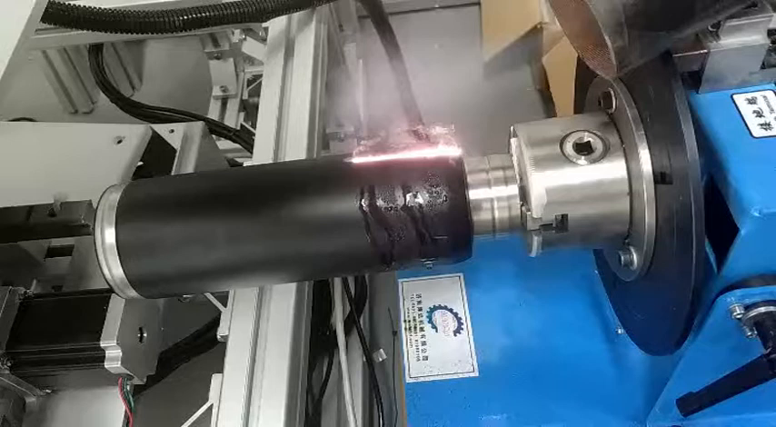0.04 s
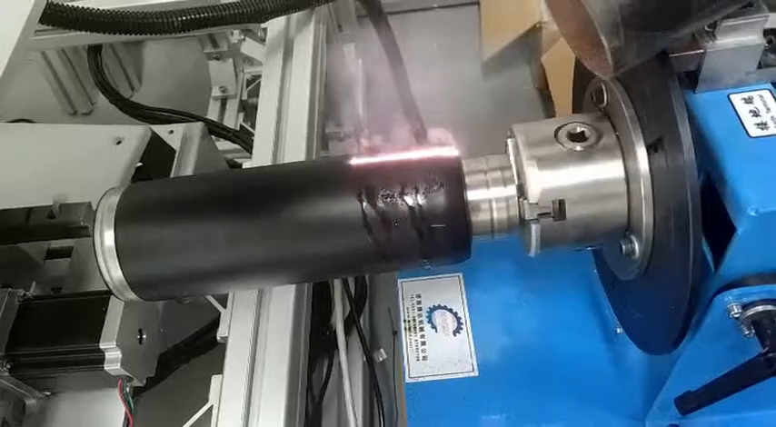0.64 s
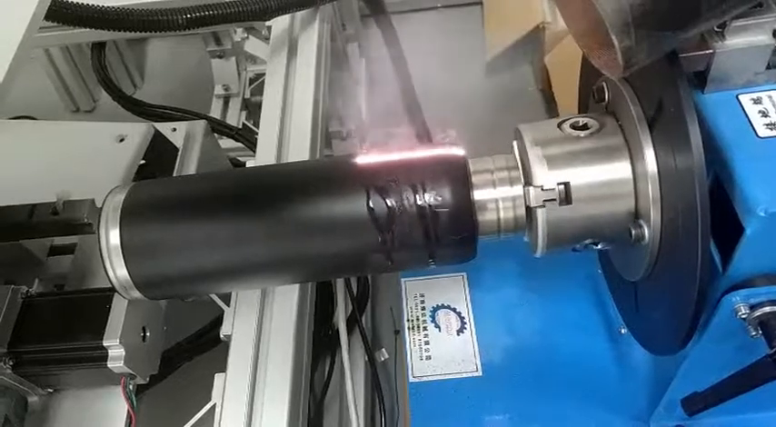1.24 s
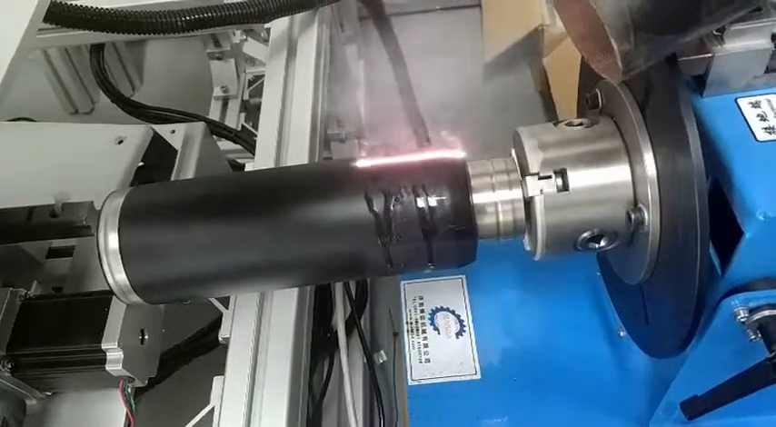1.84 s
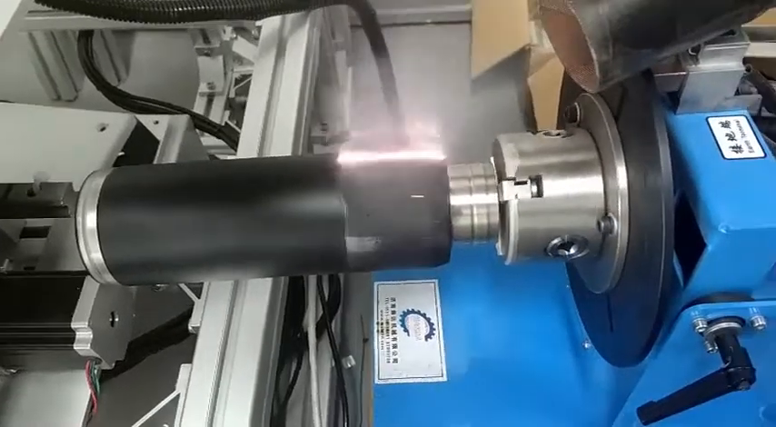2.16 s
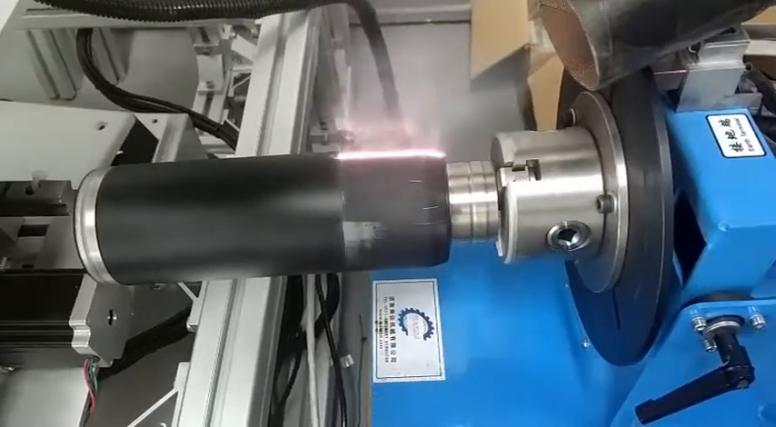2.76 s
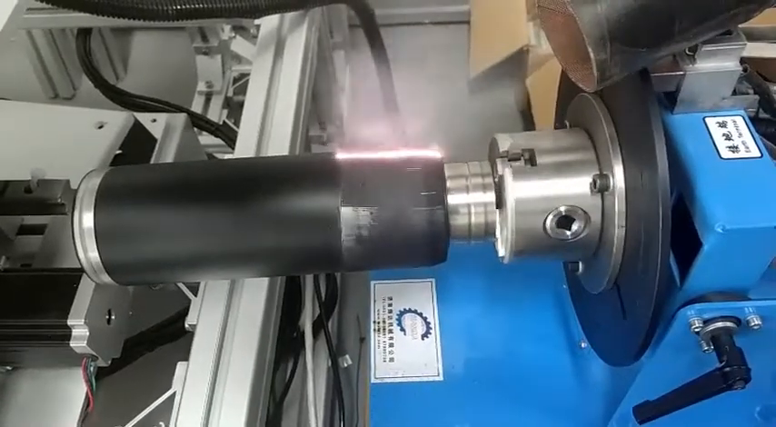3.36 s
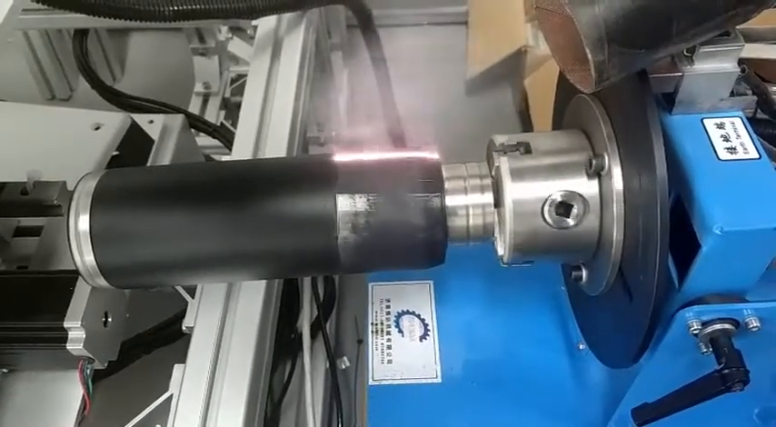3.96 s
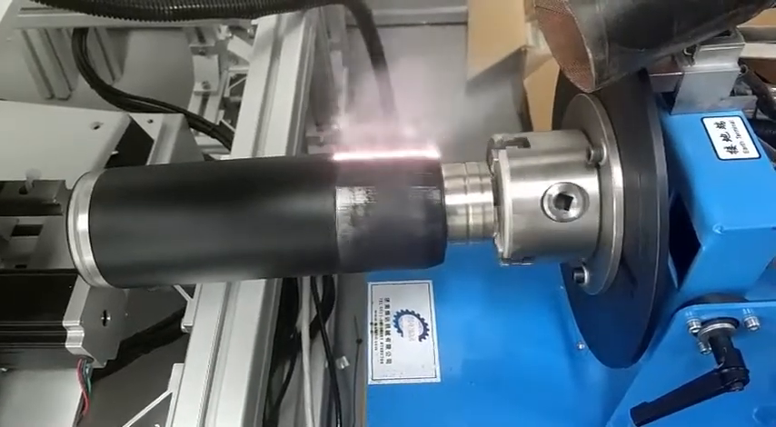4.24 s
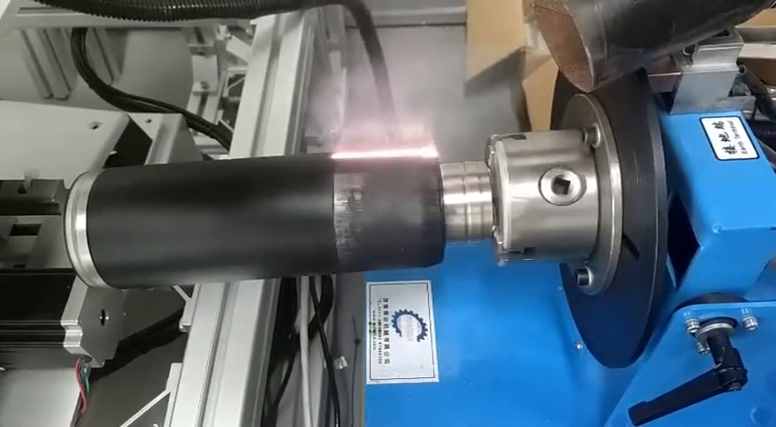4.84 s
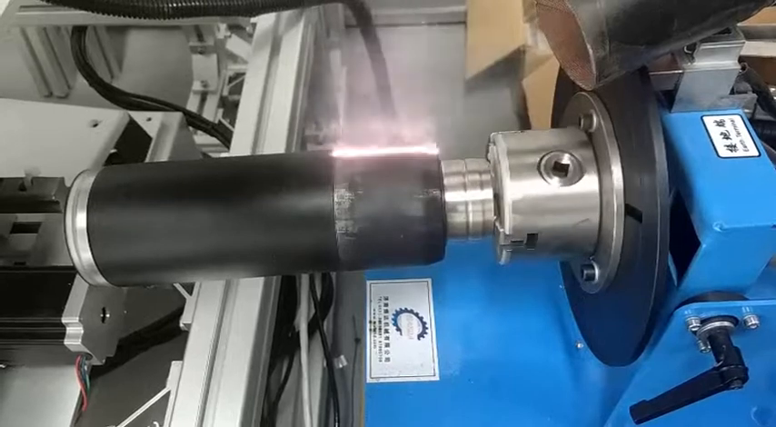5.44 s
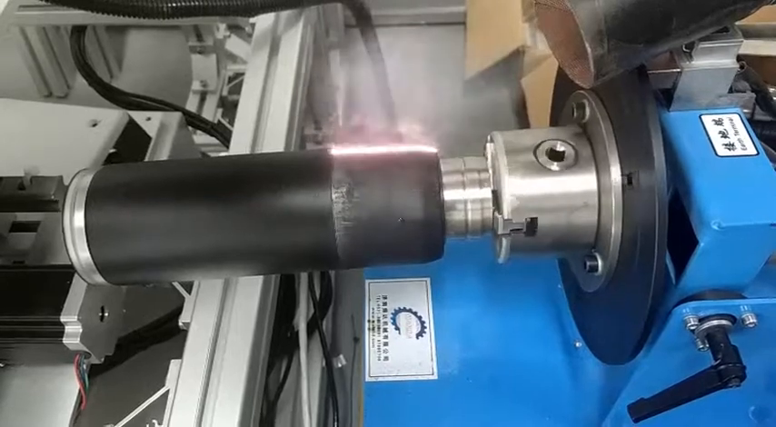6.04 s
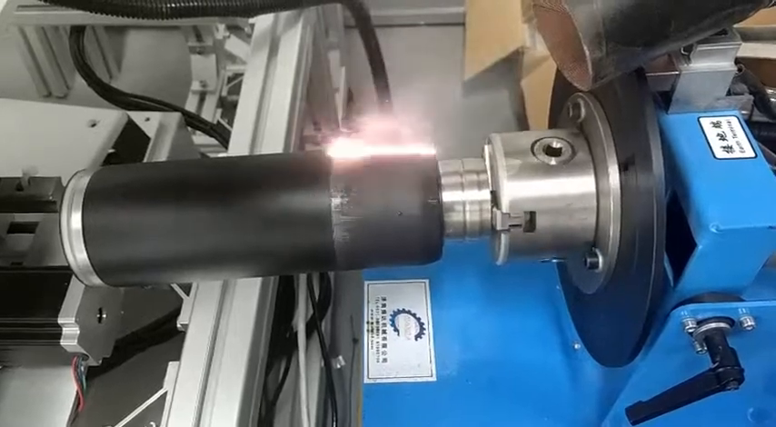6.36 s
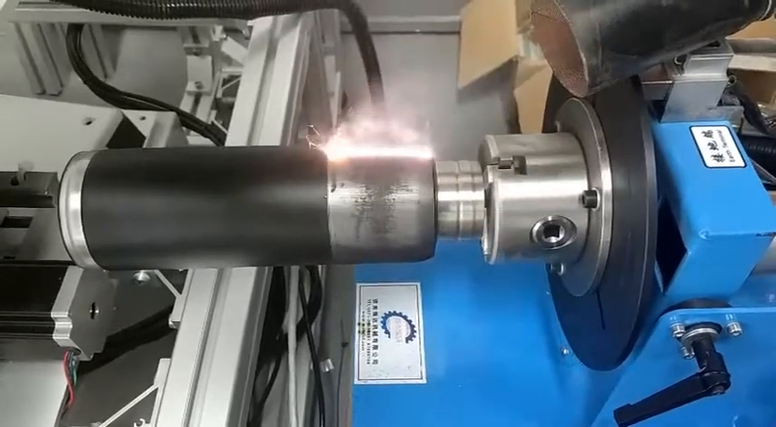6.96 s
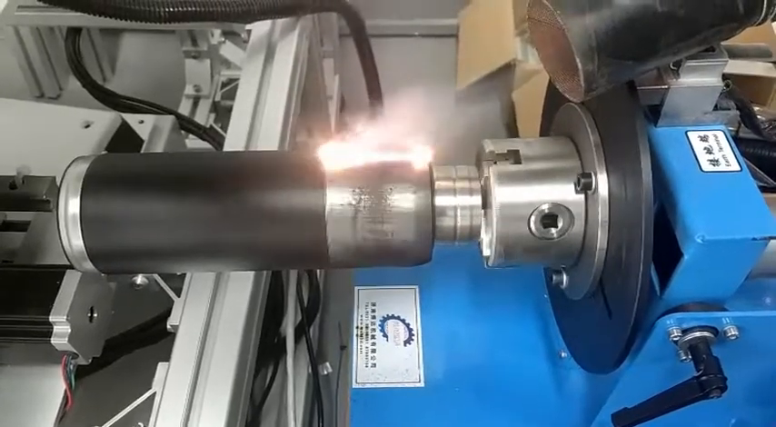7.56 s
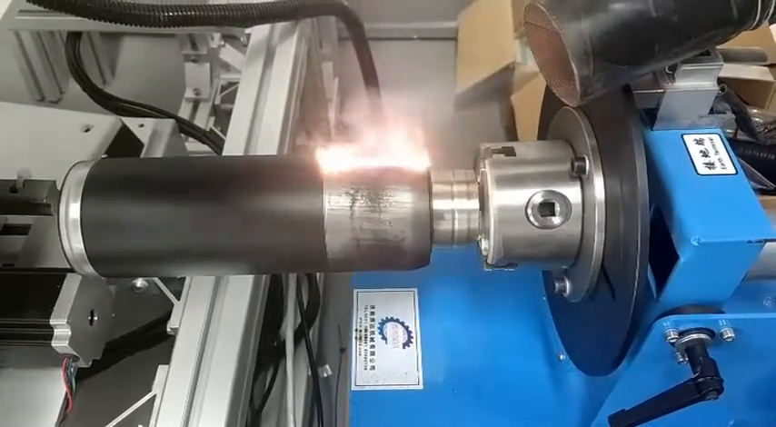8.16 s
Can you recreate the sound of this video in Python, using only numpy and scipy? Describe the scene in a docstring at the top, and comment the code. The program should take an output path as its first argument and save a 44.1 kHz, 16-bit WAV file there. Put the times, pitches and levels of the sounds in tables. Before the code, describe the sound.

A scanning laser burns black coating off a turning metal roller, close by in a workshop. It makes a loud, high sizzle with a fast, even buzz and fine snapping over a fluttering low roar. After about two seconds the roar thins and the hiss carries on. Later, short runs of chirping spurts appear, and the last pass sounds harsher and more crackly. Fume extraction rumbles very faintly underneath.

```python
"""A scanning laser strips black coating from a turning metal roller in three passes, close by in a workshop.
Ablation boils the coating off in countless vapour bursts: a low roar, a middle sputter and a high sizzle.
The beam sweeps to and fro fifty times a second, modulating the sizzle into a buzz and snapping as it turns.
Each pass meets a surface with its own spectrum; the machine frame resonates and the room reverberates.
Fume extraction rumbles faintly, a few soft thumps sound, and later on flakes burst off in short spurts."""
import sys
import numpy as np
from scipy import signal
from scipy.fft import rfft, irfft, next_fast_len
from scipy.io import wavfile
from scipy.ndimage import uniform_filter1d

SR = 44100
rng = np.random.default_rng(int(sys.argv[2]) if len(sys.argv) > 2 else 0)


def transcribe(u):
    """Save the signal u as a 16-bit wav file named by the first command-line argument.

    u: samples, shape (n,) or (channels, n), limited to [-1, 1]; the rate is SR.
    q: integer samples, one column per channel.
    """
    v = np.clip(np.atleast_2d(u).T, -1, 1)
    q = np.round(v * 32767).astype(np.int16)
    wavfile.write(sys.argv[1], SR, q)


N = 361179

SCAN_HZ, SPURT_HZ, TOP_HZ = 49.91, 2200, 11000
# the passes: thick top coat, grey undercoat, nearly bare metal (which fries most evenly)
PASS_START_S, GRAIN_DB = [0.1155, 2.186, 6.491], [1.0, .7, .4]
LAYER_EDGES_HZ = [1100, 3500]  # between roar, sputter and sizzle
THROB_TOP_HZ, RING_EDGES_HZ, HISS_EDGES_HZ = 290, [700, 1100], [3700, 5650]
# random flicker of roar, sputter and sizzle, together and each alone
FLICKER_SHARED_DB, FLICKER_OWN_DB, FLICKER_PER_S = (0.67, 0.38, 0.46), (.5, 0.54, 0.29), 22
# how far the sizzle follows a flare of the sputter, and each layer a lull
FLARE_SIZZLE_SHARE, LULL_SHARES = 0.073, (0.93, 0.98, 0.29)

# part of the burn that repeats from sweep to sweep: f/Hz, share of power
PERIODIC_SHARE = [(200, .06), (2000, .02), (2500, .03), (3600, .06), (4600, .25), (5300, .3), (7200, .36),
                  (8200, .12), (10000, .15)]
# swell of the burn along a sweep: phase/sweeps, gain/dB in pass 1, in pass 2, in pass 3
SWEEP_SWELL = [(.05, 0, 0, -.5), (.12, -1.2, -.3, -3.5), (.21, -1, 1.8, 0), (.26, -2, -1.2, 1),
               (.37, .3, 0, 0), (.48, .7, .2, -3.5), (.6, -.4, -.5, -5.5), (.68, .6, -.6, -3),
               (.78, -1.3, -2.3, 1.2), (.9, -1, -1, -.3)]
# borders of the bands that flutter independently: f/Hz
FLUTTER_EDGES = [350, 650, 1100, 1950, 3000, 5000, 7000, 8100, 8700, 9400]
# slow wavering of those bands, low to high: spread/dB
BAND_WAVER = [.9, .8, .7, .3, .2, .2, .3, .6, .8, .8, .8]
# snaps at the beam's turning points: pass index, phase/sweeps, gain/dB, decay time/ms
TURNING_SNAPS = [(0, .143, 2.5, .45), (0, .634, 10.5, .15), (1, .159, 7.5, .35), (1, .658, -1, .2),
                 (2, .001, 4.5, .8), (2, .5, 3.5, .15)]
# growth of the snaps as the metal comes bare: t/s, gain/dB
SNAP_GROWTH = [(7.1, 0), (7.6, 1.8), (7.85, 3.5)]
# single harder snaps: t/s, gain/dB
HARD_SNAPS = [(.193, 1.5), (.534, 2), (.634, 4), (.694, 2.5), (.774, 5), (.814, 0), (4.912, 4),
              (6.455, 3.5), (6.475, 7), (8.175, 4)]
# spectral envelope of each burning surface: f/Hz, gain/dB
TOP_COAT_SPECTRUM = [(100.0, -28), (150.0, -10), (195.0, 1.7), (480.0, 1), (900.0, -1.5), (1300.0, -8),
                     (2200.0, -12.5), (3100.0, -10), (4300.0, -8), (6700.0, -2.5), (7500.0, -0.5),
                     (9400.0, 0), (10200.0, -10.5), (11000.0, -36)]
UNDERCOAT_SPECTRUM = [(100.0, -56), (150.0, -19), (195.0, -6.5), (480.0, -9), (900.0, -8.5), (1300.0, -6.5),
                      (2200.0, -12), (3100.0, -12.5), (4300.0, -12.5), (6700.0, -10.5), (7500.0, -1.1),
                      (9400.0, -0.5), (10200.0, -9), (11000.0, -25.5)]
BARE_METAL_SPECTRUM = [(100.0, -62), (150.0, -18.5), (195.0, -3), (480.0, -5.5), (900.0, -5.5),
                       (1300.0, -1.5), (2200.0, -6.5), (3100.0, -5), (4300.0, -11), (6700.0, -10.5),
                       (7500.0, -2.5), (9400.0, 0), (10200.0, -12), (11000.0, -25)]
# narrow bands of each burning surface: f/Hz, width/Hz, gain/dB
TOP_COAT_BANDS = [(190, 51, -1), (318, 57, 2.5), (556, 93, -3), (890, 130, 2.6), (4620, 110, 4.5),
                  (5880, 120, 5.5), (6060, 70, -4), (6190, 310, 4), (7200, 89, 3.5), (7780, 290, 8),
                  (8580, 140, 3.5), (8800, 200, 6.5), (9150, 330, 6.5), (9750, 300, -0.5), (10760, 490, 16)]
UNDERCOAT_BANDS = [(4760, 420, 4), (5300, 240, 3.8), (5690, 400, 6), (5900, 140, 3), (6320, 100, 4.5),
                   (6560, 100, 5.5), (7270, 89, 5.5), (7500, 100, 1), (7780, 160, 0.5), (8060, 120, 4),
                   (8360, 340, 7), (9350, 200, 4), (9880, 230, 5)]
BARE_METAL_BANDS = [(400, 100, -1), (850, 120, 0), (2220, 220, 2.6), (4740, 300, 4.6), (5300, 220, 2.5),
                    (5800, 320, 5), (7700, 260, 0.5), (8350, 320, 5.2), (9970, 220, 7)]
# resonances and hollows of roller, frame and surrounding space: f/Hz, width/Hz, gain/dB
FRAME_MODES = [(209.4, 28, 8.5), (252.8, 29, 9.5), (296.4, 20, 6), (346, 9.9, 5), (429, 60, 6.5),
               (455, 26, 0.5), (508.3, 22.6, 9), (556.6, 27, 7.5), (629.5, 14, 7), (670, 30, -0.5),
               (797.6, 39, 9.5), (871, 61, 10), (1014, 39, 8.5), (1342, 51, 3.5), (1400, 46, -5.5),
               (1590, 25, 7.5), (1737, 103, 7), (1883, 34, -5), (1916, 34, 7), (2210, 460, 11.3),
               (2400, 110, -3), (2600, 280, 2.5)]
# slow course of each pass: t/s, base level/dB of roar, of sputter, of sizzle
TOP_COAT_BURN = [(0.14, -31, -31, -20), (.85, -28.5, -30.8, -21), (1.3, -29, -31.5, -19.5),
                 (2.17, -29.5, -30.5, -20.5)]
UNDERCOAT_BURN = [(2.2, -31.5, -28.5, -20.7), (2.6, -34, -28.5, -20.5), (3.45, -32.5, -29, -20.5),
                  (4.25, -34, -28, -21), (4.65, -32.5, -29.5, -20.5), (5.3, -33, -27.5, -20.5),
                  (5.75, -32, -28, -21.5), (6.47, -34, -29.5, -21)]
BARE_METAL_BURN = [(6.52, -30.5, -27.5, -22), (7.6, -32, -27.5, -21.5), (8.1, -33.5, -28, -20.5)]
# flares on thick patches of coating: centre t/s, length/s, roar gain/dB, sputter gain/dB
FLARES = [(0.26, 0.17, 5, 2), (.49, 0.3, 4.3, 1.5), (0.65, 0.17, 2.5, 0.5), (1.07, 0.17, 1.5, 3.5),
          (1.377, 0.082, 2.5, 0.5), (1.786, 0.1, 3.5, 2), (1.9, 0.082, 3.5, 0), (2.06, 0.15, 4, 0),
          (2.154, 0.067, 4, 0.5), (2.97, 0.09, 3.5, 2.5), (4.0, 0.11, 1, 0.5), (4.287, 0.12, -1, 0),
          (4.686, .07, 3.5, 3.5), (4.84, 0.097, 3, -1), (5.263, 0.073, 3.5, -0.5),
          (5.793, 0.097, 2.5, -0.5), (6.66, 0.087, 3.5, 1.5), (7.462, 0.11, 4, 0), (7.7, 0.076, 3, 1.5)]
# lulls on thin patches: centre t/s, length/s, gain/dB before LULL_SHARES
LULLS = [(2.533, .16, -1.5), (3.697, 0.23, -3), (4.178, 0.23, -3), (4.375, 0.12, -5), (5.064, 0.092, -2.5),
         (5.35, 0.085, -3), (6.404, 0.2, -3)]
# swells and sags of the deep throb, the hollow ring and the lower hiss: centre t/s, length/s, gain/dB
THROB_SWELLS = [(.485, .1, 4), (1.383, .07, 5), (1.52, .07, 6), (2.33, .08, 3), (4.683, .06, 5),
                (4.818, .1, 5), (5.29, .06, 3), (5.66, .07, 4), (5.82, .06, 3), (7.7, .07, 3),
                (1.82, .07, -7), (4.3, .3, -2), (5.89, .08, -6), (6.13, .12, -6), (6.37, .1, -3),
                (7.9, .2, -5)]
RING_SWELLS = [(1.02, 0.16, 1), (1.505, .2, -0.5), (2.043, .08, 1), (3.3, .2, 3.5), (5.345, .15, 3.5),
               (6.3, 0.28, 2), (6.565, .12, 4), (7.647, 0.054, 7), (7.802, 0.07, 4), (.17, .08, 0),
               (.42, .12, -2.5), (.78, 0.23, -3), (2.8, .12, -9)]
HISS_SWELLS = [(.42, .25, 2.3), (0.818, 0.27, 4), (1.292, 0.22, 2.5), (1.505, 0.13, 1), (3.4, 0.5, 1.5),
               (4.03, .15, -0.5), (4.27, .14, 3), (4.596, .2, 2), (5.2, 0.41, 2), (7.92, .8, 2.2),
               (2.559, .14, -4), (4.375, 0.066, -4.5), (6.41, 0.19, -4), (7.15, .25, -1.5)]
# spectral envelope of the fume extraction: f/Hz, gain/dB
RUMBLE_SPECTRUM = [(15, -5), (40, -9), (80, -6), (130, 5), (300, -8), (2000, -33), (11000, -50)]
# soft low thumps: t/s, level/dB, decay time/s, f/Hz
THUMPS = [(2.178, -38, .008, 90), (2.76, -56, .015, 100), (3.11, -50, .014, 70), (6.489, -29, .004, 115)]
# runs of spurts, one a sweep: start t/s, end t/s, typical peak level/dB, timing spread/sweeps
SPURT_RUNS = [(4.64, 4.72, -20.5, .1), (4.87, 5.04, -22, .1), (5.11, 5.29, -21, 0.081),
              (5.41, 5.99, -24, .2), (6.56, 6.7, -22, 0.078), (6.71, 6.78, -18, 0.046),
              (6.84, 7.14, -21, .08), (7.24, 7.4, -21, 0.046), (7.52, 7.56, -18.5, .01),
              (7.64, 7.85, -17.5, .01), (7.96, 8.08, -20, .01), (8.12, 8.18, -15, .01)]
# brief dips of the whole sound: t/s, gain/dB
DIPS = [(7.092, -5), (8.092, -28)]


def undb(db):
    """Amplitude ratio of a level in decibels."""
    return np.exp(np.asarray(db) * (np.log(10) / 20))


def unit(x):
    """Normalisation to rms 1."""
    return x / np.sqrt(np.mean(x ** 2))


def on_log_axis(points, hz):
    """Linear interpolation of (f/Hz, value) points over log frequency."""
    at, value = np.transpose(points)
    return np.interp(np.log(hz + 1), np.log(at), value)


def colour(x, points, peaks=(), size=16384):
    """Minimum-phase filter of an envelope plus resonances: by causality, ringing follows each click."""
    hz = np.fft.rfftfreq(size, 1 / SR)
    peaks_db = sum(gain / (1 + (2 * (hz - f) / width) ** 2) for f, width, gain in peaks)
    cepstrum = irfft(np.log(undb(on_log_axis(points, hz) + peaks_db)))
    cepstrum[1:size // 2] *= 2
    cepstrum[size // 2 + 1:] = 0
    return signal.fftconvolve(x, irfft(np.exp(rfft(cepstrum))))[:N]


def cut(x, hz, kind, order=4):
    """Maximally flat low-pass or high-pass filter."""
    return signal.sosfilt(signal.butter(order, hz, kind, fs=SR, output="sos"), x)


def split(x, edges):
    """Complementary filter bank: the bands add up to the whole."""
    size = next_fast_len(N + 4096, True)
    hz, spectrum = np.fft.rfftfreq(size, 1 / SR), rfft(x, size)
    below = [0] + [1 / (1 + (hz / edge) ** 20) for edge in edges] + [1]
    return [irfft(spectrum * (upper - lower), size)[:N] for lower, upper in zip(below, below[1:])]


def drift(rate):
    """Interpolated noise of spread 1, with `rate` new values a second."""
    steps = rng.standard_normal(N // 8)
    return np.interp(np.arange(N) / SR * rate, np.arange(len(steps)), steps) * np.sqrt(3 / 2)


def swells(t, rows):
    """Raised-cosine rises and falls of level, in dB."""
    return sum(db * np.cos(np.pi * np.clip((t - s) / length, -.5, .5)) ** 2 for s, length, db in rows)


def ablation(phase, change_rate=1.49, size=8192, count=5):
    """Vapour bursts superpose into noise; part repeats each sweep, changing as the roller turns."""
    padded = next_fast_len(N, True)
    share = on_log_axis(PERIODIC_SHARE, np.fft.rfftfreq(padded, 1 / SR))
    fresh = irfft(rfft(rng.standard_normal(padded)) * np.sqrt(1 - share), padded)[:N]
    harmonics_hz = np.arange(size // 2 + 1) * SCAN_HZ
    share = on_log_axis(PERIODIC_SHARE, harmonics_hz) * (harmonics_hz < SR / 2)
    patterns = irfft(rfft(rng.standard_normal((count, size))) * np.sqrt(share * size * SCAN_HZ / SR))
    weights = np.array([drift(change_rate) for _ in range(count)])
    weights /= np.sqrt(np.sum(weights ** 2, axis=0))
    return fresh + np.sum(weights * patterns[:, (phase * size).astype(int)], axis=0)


def reflections(x, t60, size=12000):
    """Diffuse reverberation: dense echoes start within a millisecond and decay exponentially."""
    age = np.arange(size) / SR
    tail = rng.standard_normal(size) * undb(-60 * age / t60) * (age > .0007)
    return signal.oaconvolve(x, tail / np.sqrt(np.sum(tail ** 2)))[:N]


def glints(x, t60, drift_rate, count=10):
    """Multipath interference: treble reflects off chuck and rails by paths that shift with the plume."""
    treble = cut(x, 1950, "high", order=2)
    weights = np.array([drift(drift_rate) for _ in range(count)])
    weights /= np.sqrt(np.sum(weights ** 2, axis=0) + 0.056)
    return sum(weight * reflections(treble, t60, size=1500) for weight in weights)


def snaps(pass_index, scatter_db, crack_gain, size=256):
    """Impulsive excitation: the beam dwells where it turns, giving a sharp crack and a short spit."""
    out = np.zeros(N + size)
    for index, phase, db, decay_ms in TURNING_SNAPS:
        sweeps = np.arange(phase, (N - 1) / SR * SCAN_HZ)
        onsets = sweeps / SCAN_HZ * SR
        samples = onsets.astype(int)[:, None] + np.arange(size) - 4
        age = samples - onsets[:, None]  # in samples
        crack = crack_gain * np.exp(-age ** 2 / 2)
        spit = np.exp(-np.abs(age) / SR * 1000 / decay_ms) * (age > 0) * rng.standard_normal(age.shape)
        hard_db = sum(more * (np.abs(onsets / SR - s) * SCAN_HZ < 1 / 4) for s, more in HARD_SNAPS)
        growth_db = np.interp(onsets / SR, *np.transpose(SNAP_GROWTH))
        strength = undb(db + hard_db + growth_db + scatter_db * rng.standard_normal(len(sweeps)))
        strength *= pass_index[onsets.astype(int)] == index
        out[samples] += strength[:, None] * (spit + crack)
    return out[:N]


def plume(t, pass_index, flutter_db):
    """Amplitude modulation: the noise of boiling coating swells along each sweep, between the snaps."""
    phase = t * SCAN_HZ % 1
    along, *pass_swells = np.transpose(SWEEP_SWELL)
    swell_db = np.choose(pass_index, [np.interp(phase, along, db, period=1) for db in pass_swells])
    bursts = ablation(phase)
    bursts = bursts + undb(-2.0) * glints(bursts, t60=0.053, drift_rate=14)
    # bursts of different sizes come and go independently, so the colour flutters
    bands = [band * undb(flutter_db * drift(120) + db * drift(24))
             for band, db in zip(split(bursts, FLUTTER_EDGES), BAND_WAVER)]
    low, high = split(sum(bands), LAYER_EDGES_HZ[1:])
    # roar and sputter follow the sweep less closely than the fine sizzle does
    body = low * undb(0.043 * swell_db + .5 * drift(500))
    sizzle = high * undb(swell_db + 0.14 * drift(600))
    cracks = cut(snaps(pass_index, scatter_db=1.5, crack_gain=1.2), 2800, "high", order=1)
    grain = undb(np.take(GRAIN_DB, pass_index) * drift(600))
    return (body + sizzle) * grain + cracks


def resonances(x, spectrum, bands, detune=0.0069, sway_rate=24):
    """Resonance: surface and frame colour the noise; the surface's bands shift as the plume sways."""
    lower, upper = (
        colour(x, spectrum, list(FRAME_MODES) + [(f * ratio, width, db) for f, width, db in bands])
        for ratio in (1 - detune, 1 + detune))
    blend = (1 + np.tanh(drift(sway_rate))) / 2
    return lower + blend * (upper - lower)


def burn_swings(t):
    """Source strength varies with coating thickness and by chance: dB for roar, sputter and sizzle."""
    roar, sputter = (swells(t, np.array(FLARES)[:, [0, 1, column]]) for column in (2, 3))
    flares = (roar, sputter, FLARE_SIZZLE_SHARE * sputter)
    lulls, flicker = swells(t, LULLS), drift(FLICKER_PER_S)
    layers = zip(flares, LULL_SHARES, FLICKER_SHARED_DB, FLICKER_OWN_DB)
    return [flare + share * lulls + shared_db * flicker + own_db * drift(FLICKER_PER_S)
            for flare, share, shared_db, own_db in layers]


def laser(t):
    """Source and filter: the plume excites each pass's resonances, and three layers follow the burn."""
    pass_index = np.searchsorted(PASS_START_S[1:], t)
    source = cut(plume(t, pass_index, flutter_db=1.18), 107, "high")
    passes = [(TOP_COAT_SPECTRUM, TOP_COAT_BANDS, TOP_COAT_BURN),
              (UNDERCOAT_SPECTRUM, UNDERCOAT_BANDS, UNDERCOAT_BURN),
              (BARE_METAL_SPECTRUM, BARE_METAL_BANDS, BARE_METAL_BURN)]
    swings_db = burn_swings(t)
    out = np.zeros(N)
    for index, (spectrum, bands, burn) in enumerate(passes):
        times, *levels_db = np.transpose(burn)
        gains = [undb(np.interp(t, times, db) + swing) for db, swing in zip(levels_db, swings_db)]
        layers = split(resonances(source, spectrum, bands), LAYER_EDGES_HZ)
        active = uniform_filter1d(1. * ((pass_index == index) & (t >= PASS_START_S[0])), size=160)
        out += active * sum(gain * unit(layer) for gain, layer in zip(gains, layers))
    return out


def band_swells(t, x):
    """Time-varying filtering: the deep throb, hollow ring and lower hiss each swell and sink."""
    throb, low, ring, middle, hiss, top = split(x, [THROB_TOP_HZ] + RING_EDGES_HZ + HISS_EDGES_HZ)
    swelling = [(throb, THROB_SWELLS), (ring, RING_SWELLS), (hiss, HISS_SWELLS)]
    return low + middle + top + sum(band * undb(swells(t, rows)) for band, rows in swelling)


def extraction():
    """Randomly modulated low-frequency noise: the uneven rumble of the fume extraction."""
    return unit(colour(rng.standard_normal(N), RUMBLE_SPECTRUM)) * undb(3.4 * drift(13))


def thumps(t):
    """Heavily damped oscillation: dull low knocks that die within a few cycles."""
    out = np.zeros(N)
    for start, db, decay, hz in THUMPS:
        age = np.clip(t - start, 0, 1)
        out += undb(db) * np.exp(-age / decay) * np.sin(2 * np.pi * hz * age)
    return out


def spurts(decay_s=.0014, rise_s=.0012, scatter_db=2.0, pitch_scatter=0.042, sag=.03):
    """Damped transients: flakes burst off once a sweep, each a few cycles of a slightly falling note."""
    sweeps = np.arange(int(N / SR * SCAN_HZ) + 1)
    chance = rng.standard_normal((len(sweeps), 3))
    age = np.arange(SR // 70) / SR
    envelope = (1 - np.exp(-(age / rise_s) ** 2)) * np.exp(-age / decay_s)
    envelope /= envelope.max()
    out = np.zeros(N)
    for start, end, db, stray in SPURT_RUNS:
        for sweep in sweeps[(sweeps >= start * SCAN_HZ) & (sweeps <= end * SCAN_HZ)]:
            late, weak, sharp = chance[sweep]
            onset_s = (sweep + stray * late) / SCAN_HZ - rise_s / 2
            at = min(int(onset_s * SR), N - len(age))
            hz = SPURT_HZ * (1 + pitch_scatter * sharp) * (1 + sag * np.exp(-age / decay_s))
            note = np.sin(2 * np.pi * np.cumsum(hz) / SR)
            out[at:at + len(age)] += undb(db - scatter_db * np.tanh(weak)) * envelope * note
    return out


def dips(t, recovery_s=0.0044):
    """Exponential recovery: the level drops abruptly and quickly returns."""
    return undb(sum(db * np.exp(-np.abs(t - s) / recovery_s) * (t >= s) for s, db in DIPS))


def scene():
    """Superposition in mid and side: the laser is central, while echoes and rumble give the width."""
    t = np.arange(N) / SR
    beam = band_swells(t, laser(t)) + spurts()
    running = np.clip((t - PASS_START_S[0]) / 0.0036, 0, 1)
    mid = beam + undb(-16) * reflections(beam, t60=.2)
    mid += undb(-69.0) * running * extraction() + thumps(t)
    room = reflections(beam, t60=0.27)
    side = undb(-20.5) * room + undb(-19.0) * cut(room, 360, "low", order=1)
    side += undb(-68.0) * running * cut(extraction(), 60, "high", order=3)
    balance_db = -0.28
    return dips(t) * np.array([(mid + side) * undb(balance_db), (mid - side) * undb(-balance_db)])


def record(dry):
    """Band limiting: an elliptic low-pass cuts the top steeply."""
    return signal.sosfilt(signal.ellip(10, .2, 80, TOP_HZ, fs=SR, output="sos"), dry)


dry = scene()
out = record(dry)
transcribe(out)
```